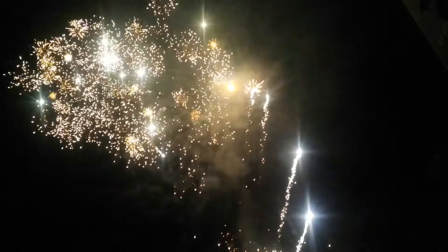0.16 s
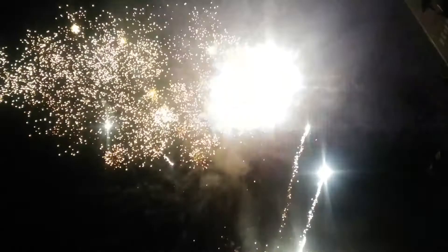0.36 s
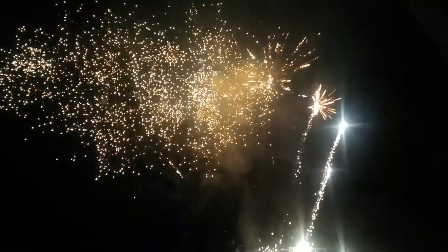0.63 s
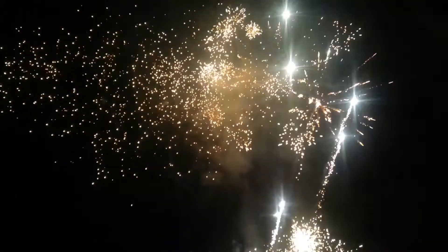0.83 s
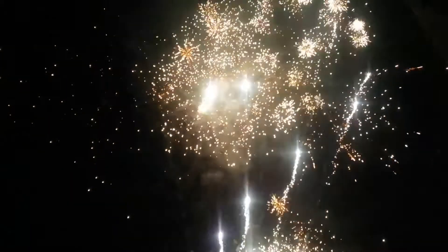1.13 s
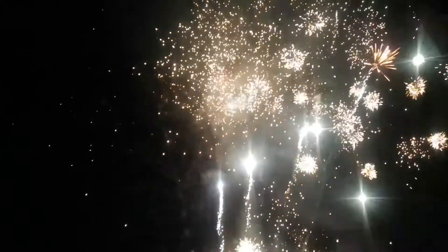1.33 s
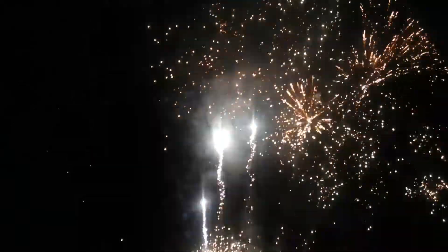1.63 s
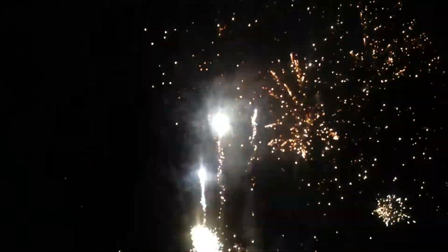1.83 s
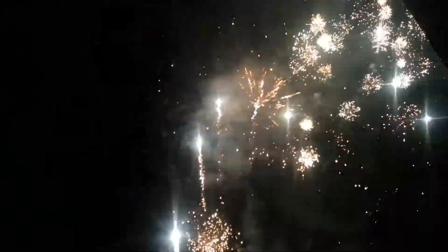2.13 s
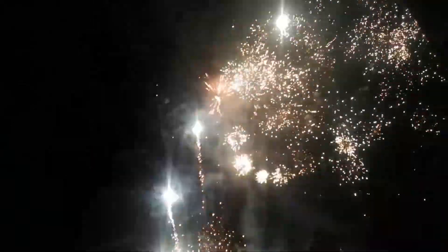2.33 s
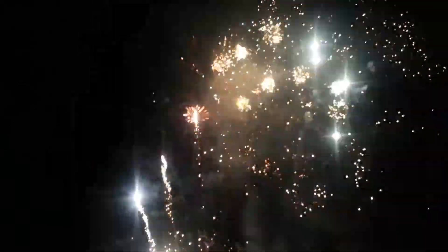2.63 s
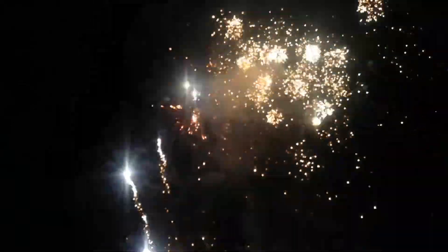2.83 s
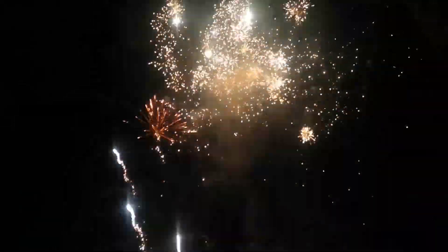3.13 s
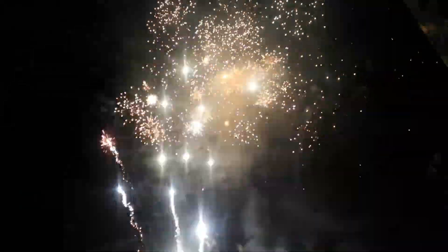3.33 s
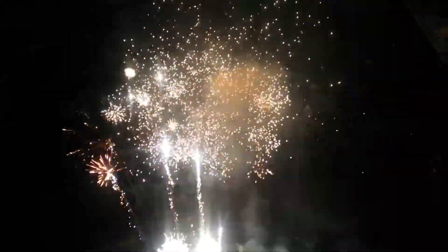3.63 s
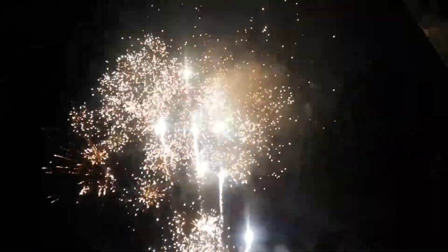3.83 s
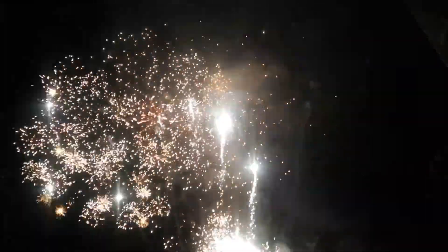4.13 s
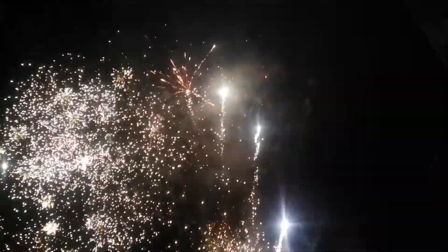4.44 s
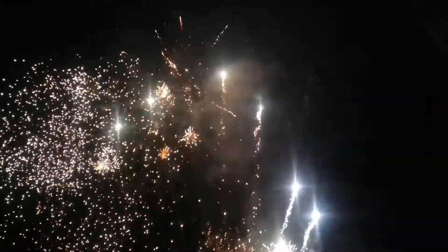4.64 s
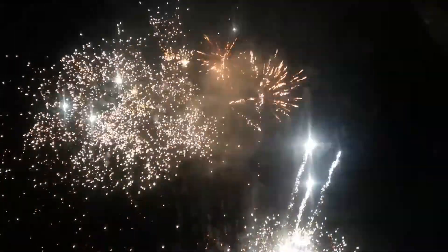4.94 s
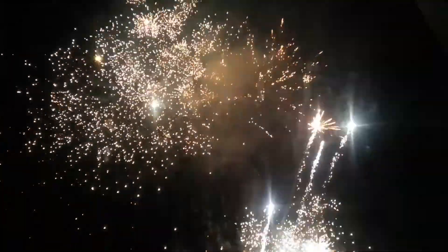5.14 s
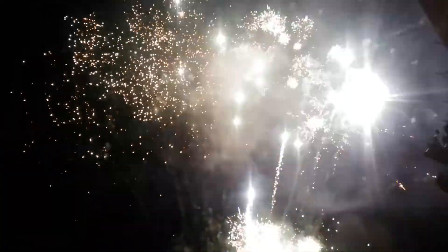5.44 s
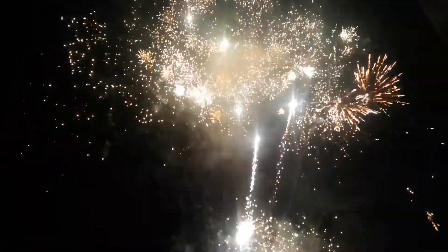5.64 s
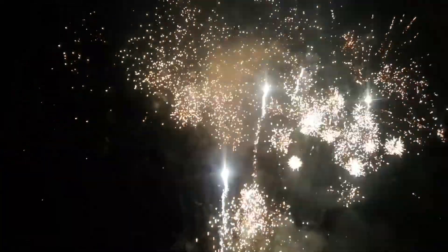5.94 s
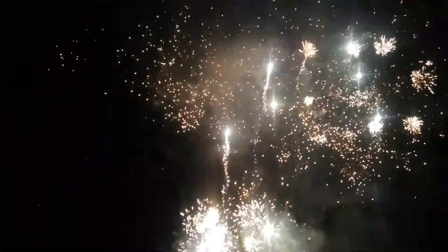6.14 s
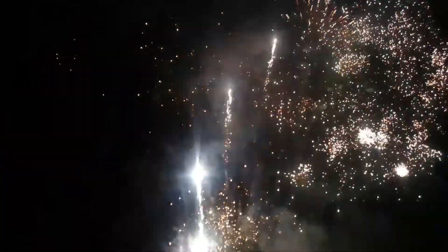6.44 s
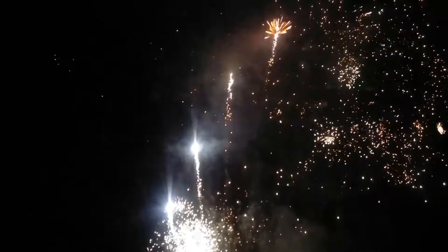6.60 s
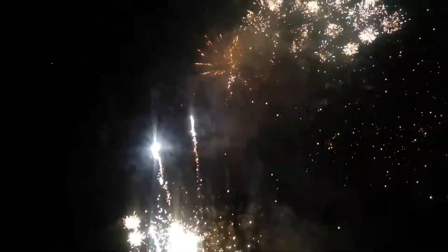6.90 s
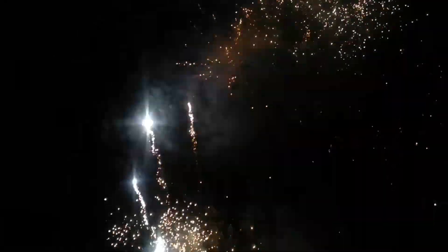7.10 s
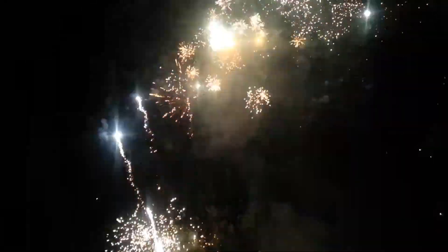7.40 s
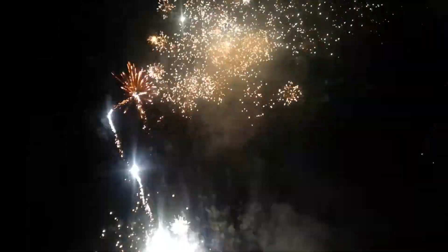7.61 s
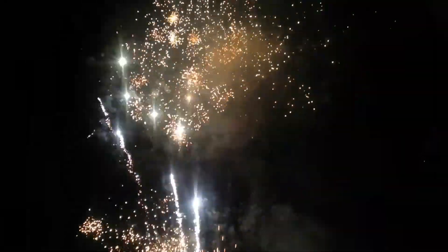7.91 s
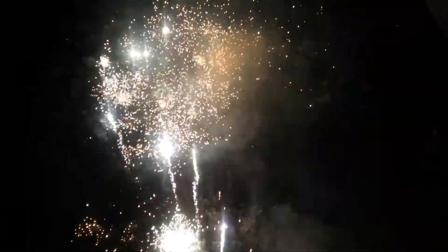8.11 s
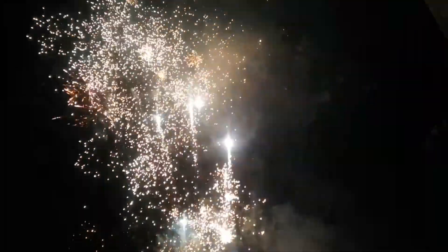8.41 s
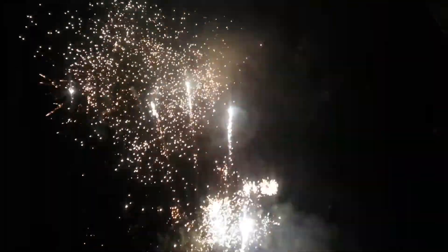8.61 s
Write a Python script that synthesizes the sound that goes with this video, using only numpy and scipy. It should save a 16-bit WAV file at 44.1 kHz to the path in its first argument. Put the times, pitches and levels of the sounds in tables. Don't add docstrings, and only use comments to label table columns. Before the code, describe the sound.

A fireworks finale runs without a real pause. Early bangs come in a tight volley, single star pops snap out around two seconds, then heavy launches continue a few tenths of a second apart. Soft deep bursts roll far above, crackling surges and thins, and echoes smear everything into a midrange roar. Wide, close, distorted stereo with slight wind rumble.

```python
import sys
import numpy as np
from scipy import signal
from scipy.fft import rfft, irfft
from scipy.io import wavfile
from scipy.ndimage import uniform_filter1d

SR = 44100
rng = np.random.default_rng(int(sys.argv[2]) if len(sys.argv) > 2 else 0)


def rack_gain(trim_db):
    fader = np.asarray(trim_db, float)
    return 10 ** (fader / 20)


def transcribe(signal):
    frames = np.atleast_2d(signal).T
    limited = np.clip(frames, -1, 1)
    pcm = np.round(limited * 32767).astype(np.int16)
    wavfile.write(sys.argv[1], SR, pcm)


N = 386316

# [s, dB, dB, dB].
BATTERY = [(0.3187, -2, -4, -9), (0.5547, -2.5, -5.5, -9), (0.7331, -1.5, -4, -20), (1.454, -1.5, -7, -34),
           (1.574, -1, -8, -36), (1.6204, 3, -9, -26), (1.8296, -4, -22, -31), (2.117, -1, -3, -9),
           (2.4278, 1, -7.5, -26), (2.7905, 0, -6, -14), (3.1542, 0, -7, -25), (3.4976, 1, -7, -13),
           (3.7598, -2.5, -3.5, -13), (4.1609, 0.5, -8.5, -13), (4.4847, 0, -9, -10),
           (4.889, -1, -5.5, -12), (4.9763, -1, -9.5, -21), (5.256, 1, -6, -25), (5.6348, -3, -1.5, -21),
           (6.2936, -1.5, -5, -14), (6.7337, -1, -6.5, -20), (6.89, 0, -9, -18), (7.3813, 0, -8, -15),
           (7.6648, 1.5, -8, -18), (8.3681, 2.5, -9, -13), (8.4577, 1.5, -10, -12)]
# [s, dB,
# dB, dB].
FAR_TUBES = [(0.6777, -6, -25, -11), (0.836, -8.5, -2, -14), (1.898, -9, -25, -35), (2.0422, -11, -16, -32),
             (3.847, -10, -20, -33), (5.4683, -5.5, -22, -32), (5.542, -8, -17, -30),
             (5.7505, -7, -12, -36), (5.7918, -16, 1, -36), (6.0497, -7, -13, -27), (6.5124, -11, -15, -34),
             (6.8255, -7.5, -5, -19), (7.8554, -13, -2, -30)]
# [s, dB, dB].
SHELLS = [(0.1244, -7, 2), (0.8005, -18, -5), (1.2363, -16, 0), (1.7877, -9, -9), (2.0771, -11, 2),
          (2.4607, -11, 0), (2.513, -18, 0), (2.8769, -8, -7), (3.094, -9.5, 0), (3.399, -7.5, 2),
          (3.5764, -13, 0), (3.634, -12, 2), (3.957, -11.5, -7), (4.271, -5.5, 0), (4.549, -24, -15),
          (4.8402, -7.5, -12), (5.188, -8.5, -11), (5.581, -11, 0), (5.9568, -6.5, 0), (6.3606, -27, 0),
          (6.6957, -7.5, -4.5), (7.118, -8.5, 0), (7.4655, -9.5, 2), (7.527, -20, 2), (7.697, -7.5, 0),
          (7.96, -5.5, 10.5), (8.295, -7.5, -4), (8.4825, -17, 0), (8.579, -12, -6)]
# [s, dB].
LONE_STARS = [(0.9373, -11), (0.966, -16), (1.797, -8), (1.8112, -4), (1.842, -7), (1.929, -9), (1.9436, 1),
              (1.969, -4), (1.9914, -12), (2.0216, -1), (2.057, -3), (2.0742, -10), (2.6306, -1),
              (2.6834, -25), (3.0584, -12), (4.0851, 1), (5.224, 0), (5.3772, 2), (5.517, -5), (5.985, 8),
              (6.1604, -4), (6.241, -10), (7.1534, -17), (7.17, -8), (7.2174, -11), (7.3218, 0),
              (7.5175, -6), (7.6124, 12), (7.9818, -15), (8.0126, -4)]
# [s, dB, s].
CLUSTERS = [(.27, -13.5, .06), (.5, -10.5, 0.059), (1.39, -16, 0.019), (1.8, -17, 0.018),
            (1.95, -22, 0.019), (2.33, -13, 0.043), (2.44, -10.5, 0.052), (2.78, -12.5, 0.028),
            (3.13, -10.5, .06), (3.55, -10, 0.047), (3.77, -15, 0.025), (3.88, -9, 0.056),
            (4.07, -12, 0.021), (4.3, -13, 0.18), (4.55, -18, 0.064), (4.9, -14, 0.07), (5.3, -34, .04),
            (5.61, -14, 0.052), (5.82, -13, .08), (6.27, -33, .05), (6.5, -20, 0.11), (6.93, -17, .04),
            (7.57, -17, .05), (7.84, -14.5, 0.059), (8.12, -14, 0.076), (8.25, -13, 0.13),
            (8.45, -17.5, 0.1), (8.6, -13, 0.089)]
# [s, dB, dB].
SKY_TIDE = [(0, -18, -13.5), (.05, -13, -16.5), (.8, -15.5, -17), (1.1, -11.5, -16), (1.55, -14, -15.5),
            (1.75, -22, -12), (2.1, -17, -17.5), (2.6, -17.5, -15), (3.3, -15.5, -18), (4.0, -16, -16.5),
            (5.1, -14, -15.5), (5.55, -16, -15), (6.2, -15.5, -19.5), (7.15, -16.5, -14.5),
            (7.28, -22, -18), (7.4, -13, -15), (8.0, -18, -18.5), (8.76, -19.5, -15)]
# [Hz, dB/Hz].
ECHO_COLOUR = [(40, -23.5), (104, -21), (174, -15), (330, -10.5), (540, -1.5), (700, -4), (885, -6.5),
               (1130, -16), (1600, -25.5), (3000, -36.5)]
# [Hz, dB].
POP_COLOUR = [(60, -24), (250, 7), (600, 13), (1150, 5.5), (1700, 11.5), (2500, 12), (4000, 11.5),
              (5500, 7), (7200, 11.5), (8300, 3.5)]
# [Hz, dB].
WALL_COLOUR = [(300, -7.5), (1500, 1), (3500, -4.5), (8000, -4)]
# [Hz, dB/Hz].
SIZZLE_COLOUR = [(9400, -12), (9650, -3), (9900, -2), (10500, 0.5), (12500, -8), (14000, -7), (15600, -13),
                 (15800, -60)]
# [Hz, dB].
BAND_LIMITS = [(0, -16), (70, 0), (8000, 0), (8500, -5), (8850, -15), (9050, -50), (16000, -66)]
# [Hz, dB].
PORT_MISMATCH = [(60, -0.5), (110, -1.5), (200, 1), (380, 0), (700, 0.5), (1290, 0.5), (2380, 0),
                 (4400, -1), (8120, -2.5), (15000, 5.5)]

PORT_LAG = 24
STAR_LAG = 6
GROUND_ECHO_MS, ECHO_SCATTER_MS = 7.37, 0.77
GATHER, GATHER_T60_S = .7, 0.25
THUD_LAG_S, HEAVE_LAG_S, LAUNCH_HEAVE_DB = .009, 0.0042, -2
CLUSTER_FALL = 0.77
BUNCH_DB, LUMP_DB = 1.1, 1.2
SIZZLE_DB, SIZZLE_FOLLOW = -37, 0.42
FLASH_DB, FLASH_S = 2, .025
DUCK_DB, DUCK_S = -2, 0.082
EDGE_HZ, EDGE_WANDER_HZ = 13900, 500
GENEROUS_S = 2.13
CEILING = .96


def launches(roar_db):
    s, db, swarm_db, _ = np.transpose(BATTERY + FAR_TUBES)
    chance = rng.uniform(-1.2, 1, (len(s), 2)).T
    t = np.arange(1500) / SR
    crack = np.cos(2 * np.pi * 7200 * t) * rack_gain(-60 * t / 0.0079)
    tube_hz = 600 + 250 * np.exp(-t / 0.0025)
    tube = -np.sin(2 * np.pi * np.cumsum(tube_hz) / SR) * rack_gain(-60 * t / 0.023)
    low = -np.sin(2 * np.pi * 500 * t) * rack_gain(-60 * t / 0.02)
    side = .24 * chance[0]
    echo_s = s + (GROUND_ECHO_MS + ECHO_SCATTER_MS * chance[1]) / 1000
    direct_ring = ring(shocks(s + 0.00019, rack_gain(db + 5.0), side), tube)
    ground_ring = ring(shocks(echo_s + 0.00016, rack_gain(db + 4.5), side), low)
    crack_size = rack_gain(3.1 * np.r_[db, db - 1.5])
    cracks = ring(shocks(np.r_[s, echo_s], crack_size, np.r_[side, side]), crack)
    return direct_ring + ground_ring + cracks + echoes(s + 0.0062, db + swarm_db + 2.5, 0.7, roar_db)


def echoes(s, db, t60, roar_db):
    hits = np.zeros(N)
    hits[(s * SR).astype(int)] = rack_gain(2 * db)

    def fade(t60_s):
        return signal.lfilter([1], [1, -rack_gain(-120 / t60_s / SR)], hits)

    lumps = rack_gain(2 * LUMP_DB * flicker(size=300) - 1.1)
    power = (fade(t60) - GATHER * fade(GATHER_T60_S)) * lumps + rack_gain(2 * roar_db)
    when, size, side, turn = swarm(count=20000, spread_db=0.5)
    returns = shocks(when, size * np.sign(turn - .5), 1.67 * side)
    return unit(colour(returns, ECHO_COLOUR)) * np.sqrt(power)


def bursts():
    launch_thuds = [(s + THUD_LAG_S, db, LAUNCH_HEAVE_DB) for s, _, _, db in BATTERY + FAR_TUBES]
    s, db, deep_db = np.transpose(SHELLS + launch_thuds)
    side, lean = rng.uniform(-1.1, 1, (len(s), 2)).T
    t = np.arange(-600, 8000) / SR
    thud = np.cos(2 * np.pi * 215 * t) * np.exp(-(t / 0.0021) ** 2)
    heave = np.sin(2 * np.pi * 70 * t) * np.exp(-(t / 0.013) ** 2) * rack_gain(-17.0)
    wall = np.cos(2 * np.pi * 200 * (t - .0575)) * np.exp(-((t - .061) / 0.0088) ** 2) * rack_gain(-10.5)
    snap = rng.standard_normal(len(t)) * np.exp(-((t + 0.0045) / 0.0029) ** 2) * rack_gain(-1.0)
    hits = shocks(s + t[0], rack_gain(db + 2.5), .6 * side - .3)
    heaves = shocks(s + t[0] + HEAVE_LAG_S, rack_gain(db + deep_db), side, 7.6 * lean)
    roll_power = ring(hits ** 2, (t > 0) * rack_gain(-120 * t / 0.9))
    roll = np.sqrt(roll_power.clip(0)) * rack_gain(-22.5)
    wind = colour(rng.standard_normal((2, N)), [(20, 12), (50, -6), (110, -8), (200, -5), (400, -52)])
    gust = rack_gain(7.2 * unit(uniform_filter1d(rng.standard_normal((2, N)), size=4000)))
    shells = ring(hits, snap + thud + wall) + ring(heaves, heave)
    return shells + unit(wind) * roll + unit(wind * gust) * rack_gain(-48.5)


def crackle(level_db):
    level_db = level_db + BUNCH_DB * flicker(size=1500)

    def level_at(when):
        return level_db[(when * SR).astype(int)]

    mid_s, mid, mid_side, _ = swarm(count=1300, spread_db=-0.43)
    far_s, far, far_side, _ = swarm(count=6000, spread_db=5.0)
    s = np.r_[mid_s, far_s]
    size = np.r_[mid * rack_gain(13.0), far * rack_gain(4.0)] * rack_gain(level_at(s))
    lone_s, lone_db = np.transpose(LONE_STARS)
    close_s = swarm(count=240, spread_db=1)[0]
    near_s = np.r_[lone_s, close_s]
    near_db = np.r_[lone_db + 7.0, 3.0 + .6 * (level_at(close_s) + 14)]
    s, size = np.r_[near_s, s], np.r_[rack_gain(near_db), size]
    near_side = STAR_LAG * rng.standard_normal(len(near_s)) / PORT_LAG
    side = np.r_[near_side, .45 * mid_side, far_side]
    turn, tilt = rng.random((len(s), 2)).T
    direct = shocks(s, size, side, 8.0 * (tilt - .5))
    ground_s = s + .0002 + .0008 * turn
    ground = shocks(ground_s, size * rack_gain(-4.5), side + .6 * (tilt - .5), 10 * (turn - .5))
    t = np.arange(400) / SR
    pop = (t == 0) - rack_gain(-17.0) * np.sin(2 * np.pi * 900 * t) * rack_gain(-60 * t / 0.0062)
    linger_db = uniform_filter1d(level_db, size=6000, origin=2999)
    walls = colour(rng.standard_normal((2, N)), WALL_COLOUR) * rack_gain(linger_db - 7.0)
    return colour(ring(direct + ground, pop) + walls, POP_COLOUR)


def sizzle(loud):
    sizzle_db = sky()[2]
    swell = unit(uniform_filter1d(loud ** 2, 300) ** 0.2)
    hz, s, cells = signal.stft(rng.standard_normal((2, N)) * swell, SR, nperseg=2048)
    size = np.abs(cells)
    din = size.mean(axis=(0, 1))
    alive = size > din * rack_gain(4 + hz[:, None] / 8000)
    wander_hz = EDGE_WANDER_HZ * unit(uniform_filter1d(rng.standard_normal(len(s)), size=2))
    is_open = (s < GENEROUS_S) | (din > np.quantile(din, .93))
    edge_hz = np.where(is_open, 15720, EDGE_HZ + wander_hz)
    kept = cells * alive * (hz[:, None] < edge_hz)
    flecks = signal.istft(kept, SR, nperseg=2048)[1][:, :N]
    return unit(colour(flecks * swell ** 0.48, SIZZLE_COLOUR)) * rack_gain(sizzle_db)


def sky():
    t = np.arange(0, N + 64, 64) / SR
    s, tide_db, roar_db = np.transpose(SKY_TIDE)
    peak_s, db, rise_s = np.transpose(CLUSTERS)[:, :, None]
    late = (t - peak_s) / rise_s
    lumps = rack_gain(2 * db) * np.exp(-(late / np.where(late > 0, CLUSTER_FALL, 1)) ** 2)
    crackle_db = 10 * np.log10(rack_gain(2 * np.interp(t, s, tide_db)) + lumps.sum(axis=0))
    since = t - np.array(BATTERY)[:, :1]
    after = np.maximum(since, 0) / DUCK_S
    flash_db = FLASH_DB * np.exp(-(since / FLASH_S) ** 2)
    duck_db = DUCK_DB * after * np.exp(1 - after)
    sizzle_db = SIZZLE_DB + SIZZLE_FOLLOW * (crackle_db + 18) + (flash_db + duck_db).sum(axis=0)
    controls = (crackle_db, np.interp(t, s, roar_db), sizzle_db)
    return [np.interp(np.arange(N) / SR, t, control) for control in controls]


def swarm(count, spread_db):
    when, side, other, odds, turn = rng.random((count, 5)).T
    size = rack_gain(-spread_db * np.log(1 - .995 * odds))
    return when * N / SR, size / np.sqrt(np.mean(size ** 2)), side - other, turn


def shocks(s, size, side, pan_db=0):
    out = np.zeros((2, N))
    for port, sign in enumerate((1, -1)):
        at = np.round(s * SR + sign * side * PORT_LAG / 2).astype(int)
        np.add.at(out[port], np.clip(at, 0, N - 1), size * rack_gain(sign * pan_db / 2))
    return out


def ring(x, kernel):
    return signal.fftconvolve(x, kernel[None], axes=1)[:, :N]


def flicker(size):
    return unit(uniform_filter1d(uniform_filter1d(rng.standard_normal(N), size), size))


def colour(x, points):
    hz, db = np.transpose(points)
    grid = np.linspace(1, SR / 2, 2049)
    log_gain = np.interp(np.log(grid), np.log(np.maximum(hz, 1)), db) * np.log(10) / 20
    cep = irfft(log_gain)
    cep[1:2048] *= 2
    cep[2049:] = 0
    kernel = irfft(np.exp(rfft(cep)))[:2048]
    return ring(x, kernel)


def unit(x):
    return x / np.sqrt(np.mean(x ** 2))


def scene():
    crackle_db, roar_db, _ = sky()
    return launches(roar_db) + bursts() + crackle(crackle_db)


def roll_off(x):
    return signal.sosfilt(signal.butter(12, 15720, fs=SR, output="sos"), x)


def record(dry):
    ports = []
    for k, sign in enumerate((1, -1)):
        tone = [(hz, sign * db / 2) for hz, db in PORT_MISMATCH]
        ports.append(colour(dry[[k]], tone)[0])
    loud = np.array(ports)
    hz, db = np.transpose(BAND_LIMITS)
    band_gain = rack_gain(np.interp(np.arange(N // 2 + 1) * SR / N, hz, db / 2))
    for knee in (3.5, 8):
        loud = loud / (1 + np.abs(loud / CEILING) ** knee) ** (1 / knee)
        loud = irfft(rfft(loud) * band_gain, N)
    return roll_off(loud + sizzle(loud))


dry = scene()
out = record(dry)
transcribe(out)
```